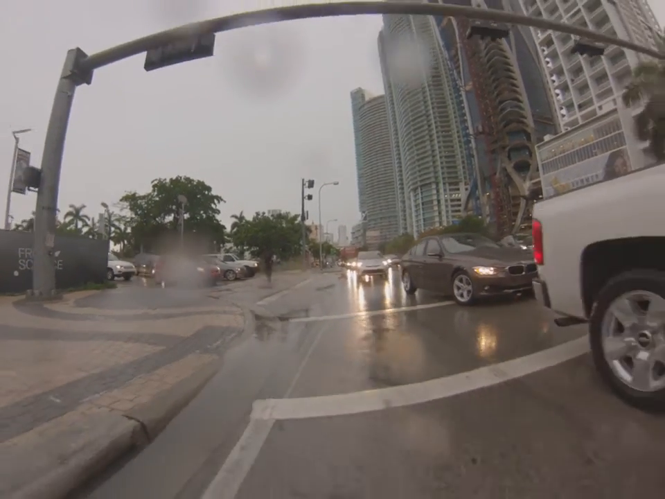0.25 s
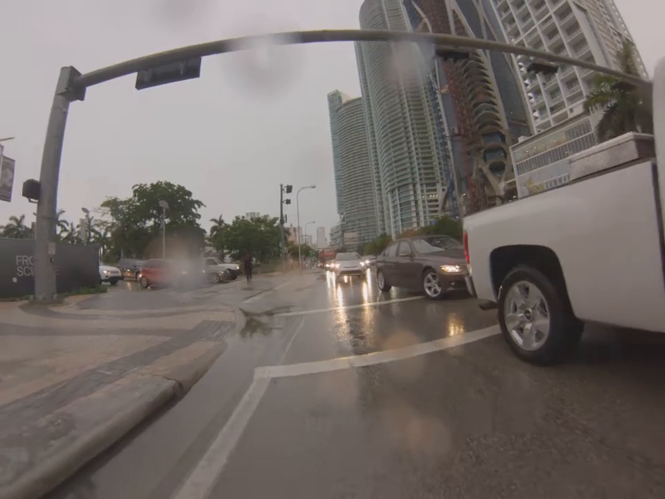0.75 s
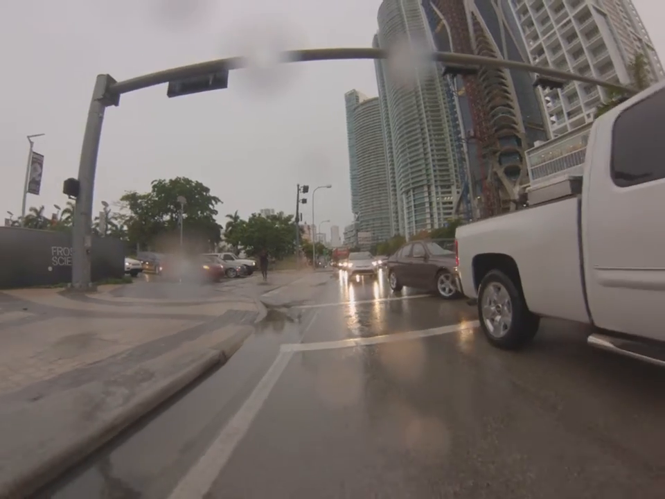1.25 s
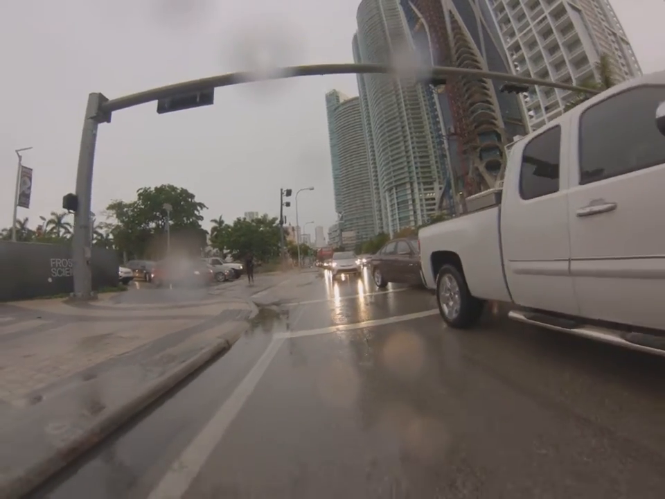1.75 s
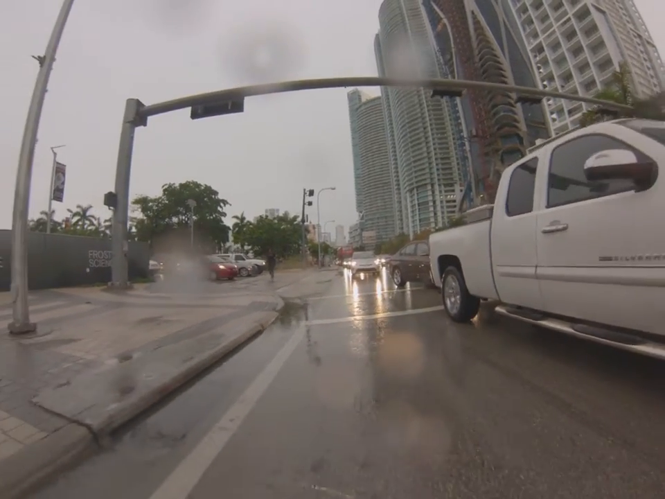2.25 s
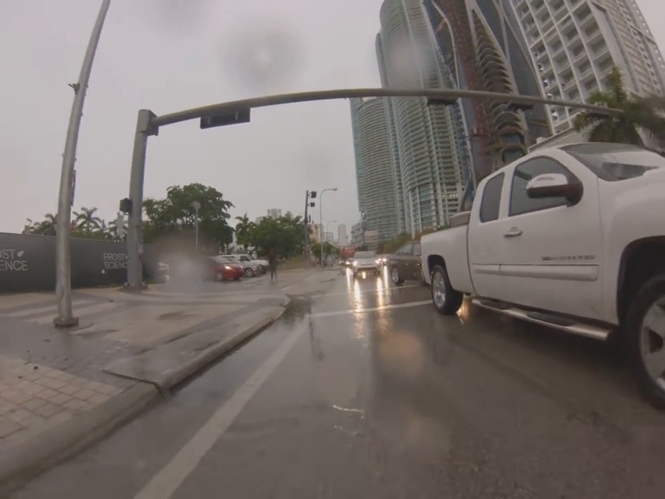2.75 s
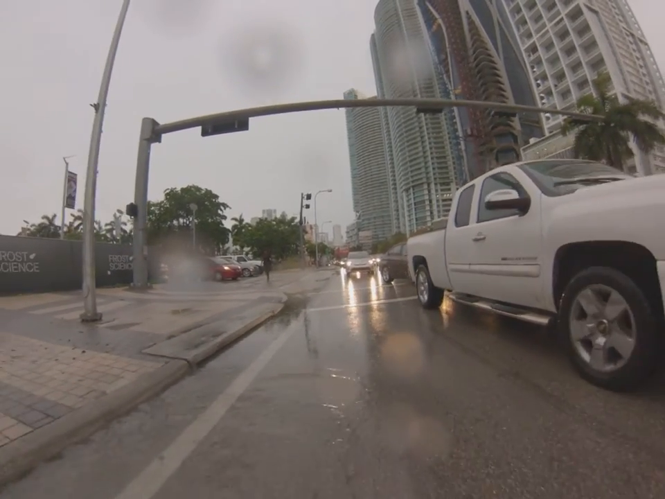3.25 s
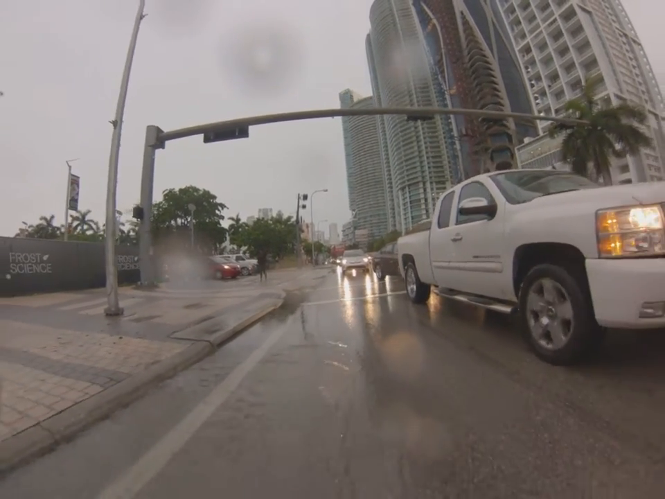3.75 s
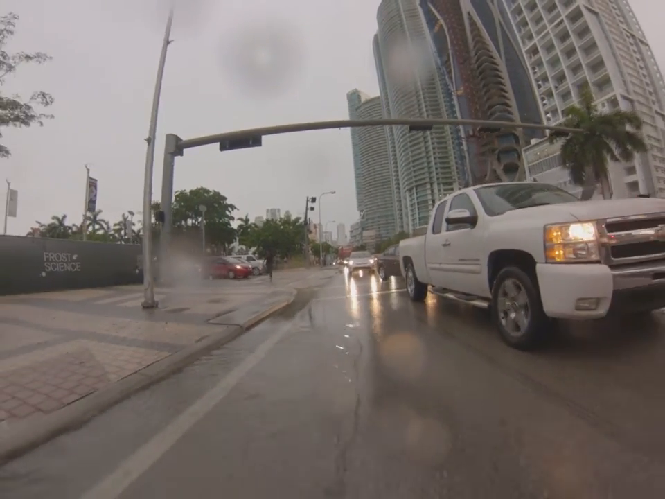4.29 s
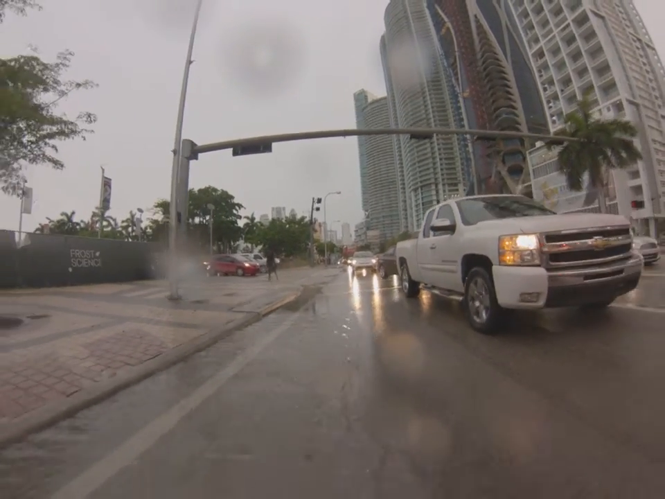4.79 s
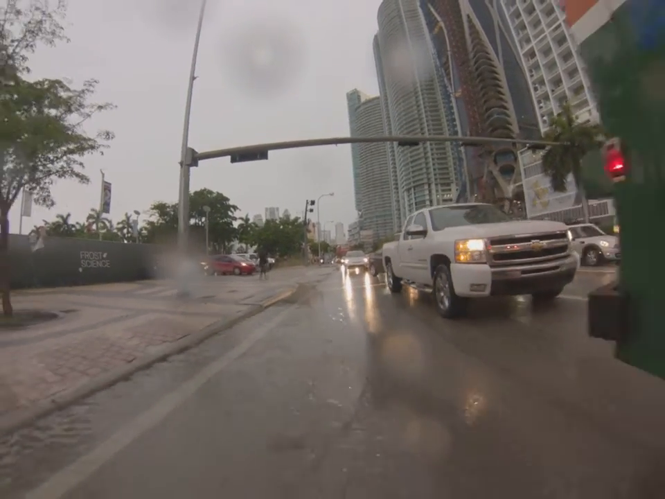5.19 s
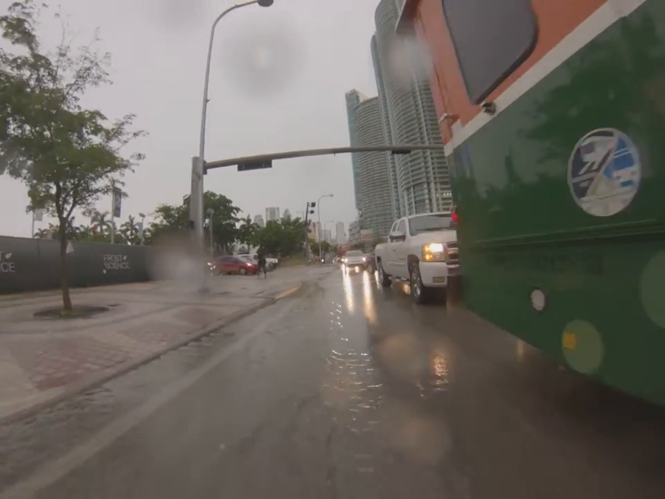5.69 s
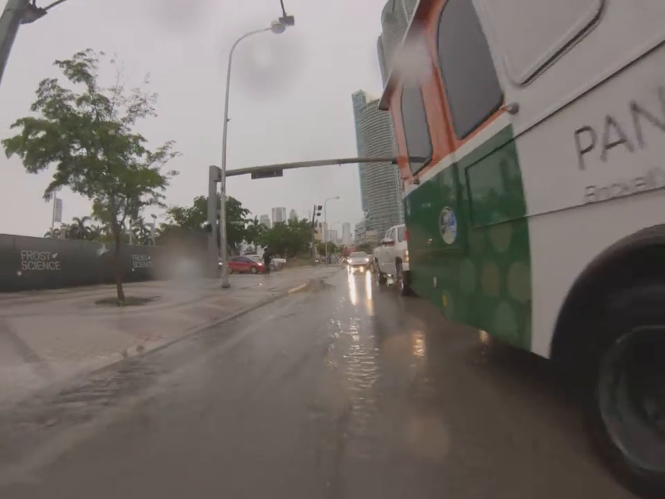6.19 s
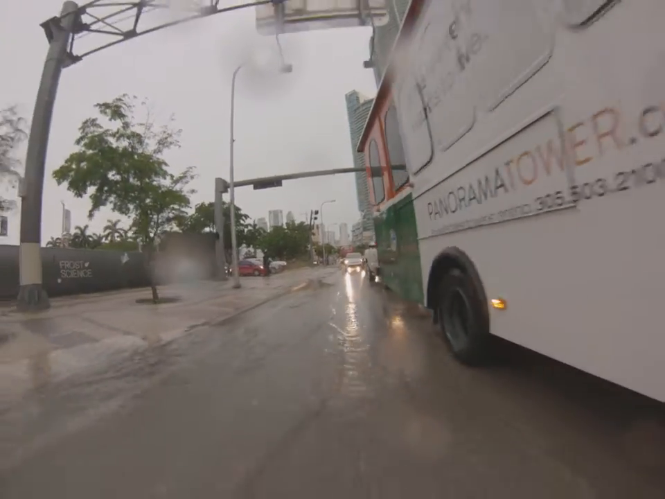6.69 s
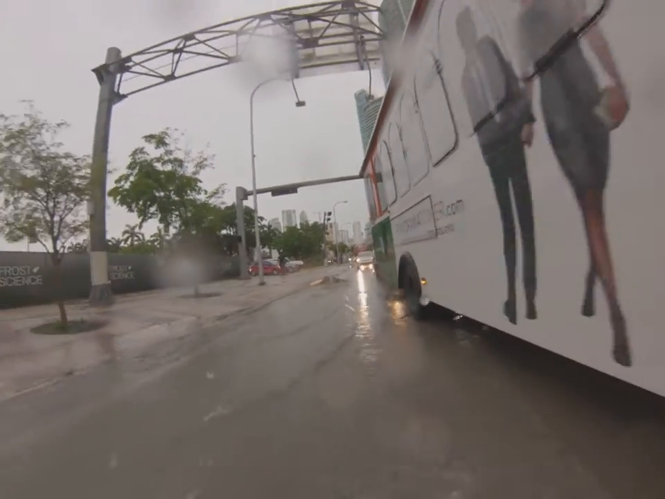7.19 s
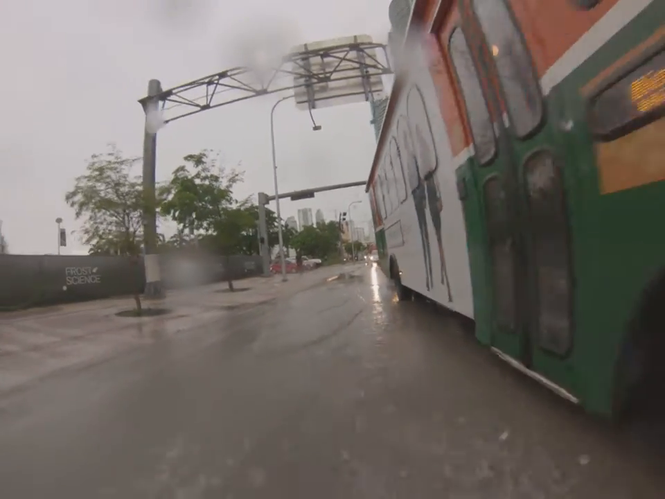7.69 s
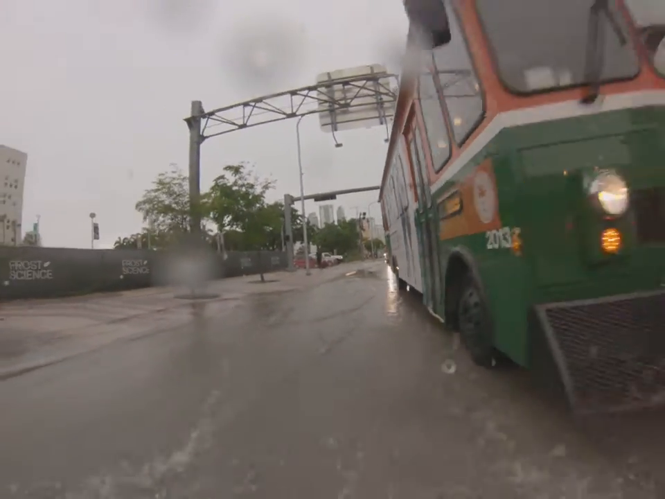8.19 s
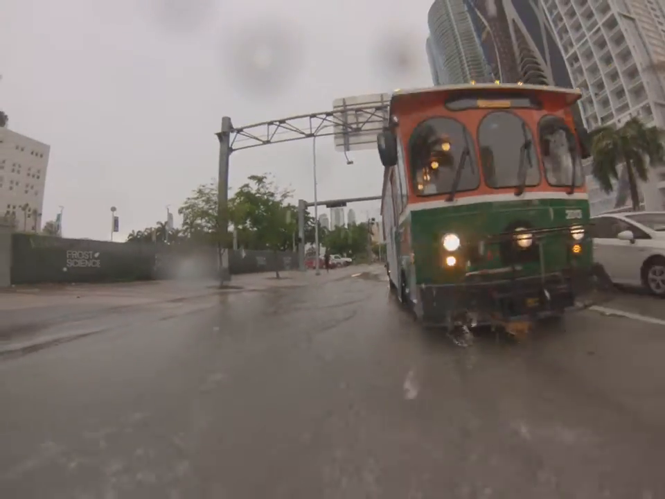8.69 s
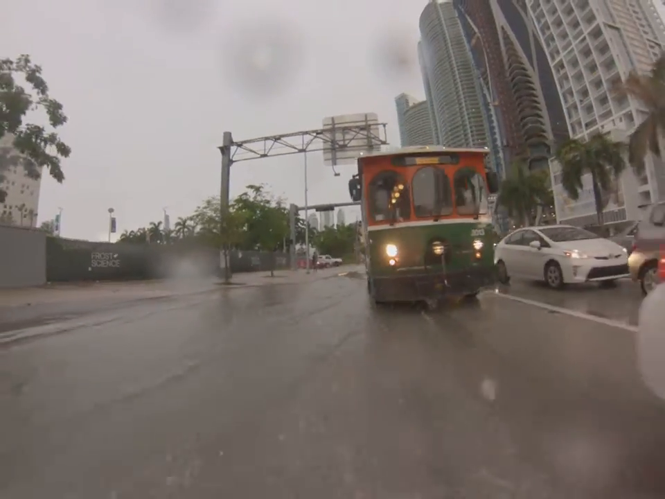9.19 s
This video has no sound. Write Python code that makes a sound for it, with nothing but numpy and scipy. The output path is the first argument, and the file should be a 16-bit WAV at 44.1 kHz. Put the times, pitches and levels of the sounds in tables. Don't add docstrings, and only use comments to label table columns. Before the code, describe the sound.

A V-twin motorcycle idles with muffled, lumpy booming, blips its throttle, then pulls away through standing water as tyre spray hisses louder.

```python
import sys
import numpy as np
from scipy import signal
from scipy.io import wavfile
from scipy.ndimage import uniform_filter1d

SR = 44100
rng = np.random.default_rng(int(sys.argv[2]) if len(sys.argv) > 2 else 0)


def store_wav(level_fs):
    pcm = np.round(np.clip(np.atleast_2d(level_fs), -1, 1) * 32767)
    wavfile.write(sys.argv[1], SR, pcm.T.astype(np.int16))


def boost(x):
    u = np.asarray(x, float) / 20
    return 10 ** u


N = 416744
T = np.arange(N) / SR
LEAD = 8000

# time_s, cycles_per_s
SPEED = [(0.0, 16.804), (0.46, 11.733), (0.8, 11.192), (2.62, 11.008), (3.18, 10.834), (3.5, 13.232),
         (3.77, 11.794), (3.93, 12.068), (4.2, 13.93), (4.43, 11.046), (4.53, 11.501), (4.75, 18.2),
         (4.88, 18.665), (5.2, 14.029), (5.57, 14.433), (6.28, 13.566), (7.8, 15.55), (9.45, 16.477)]
# time_s, level_db
EFFORT = [(0, -28), (.25, -31.5), (.8, -30.5), (1.25, -28), (1.6, -29.5), (2.5, -28.5), (3.16, -29),
          (3.37, -23.5), (3.55, -31), (3.85, -23.5), (4.2, -26), (4.35, -30.5), (4.76, -21.5), (5.08, -27),
          (5.35, -25.5), (6.4, -28.5), (8.6, -27.5), (9.45, -27)]


def evened(x):
    return x / np.sqrt(np.mean(x ** 2) + 1e-20)


def column(rows, index):
    return np.interp(T, [r[0] for r in rows], [r[index] for r in rows])


def colour(x, points):
    f, db = np.transpose(points)
    hz = np.abs(np.fft.fftfreq(2 ** 15, 1 / SR))
    gain_db = np.interp(np.log(hz + 1), np.log(f), db, -90, -120)
    log_gain = np.log(boost(np.maximum(gain_db, -120)))
    taps = np.fft.ifft(np.exp(np.conj(signal.hilbert(log_gain)))).real[:2 ** 14]
    return signal.oaconvolve(x, taps)[:len(x)]


def resonate(x, hz, width):
    turn = np.exp(2j * np.pi * np.cumsum(hz * np.ones(N)) / SR)
    r = np.exp(-np.pi * width / SR)
    return (turn * signal.lfilter([1], [1, -2 * r, r * r], x / turn)).real


def steady(x, seconds):
    width = int(seconds * SR)
    power = uniform_filter1d(uniform_filter1d(x ** 2, width), width)
    return x / np.sqrt(power + 1e-20)


def wander(hz):
    pole = [1, -np.exp(-2 * np.pi * hz / SR)]
    once = signal.lfilter([1], pole, rng.standard_normal(N))
    return evened(signal.lfilter([1], pole, once))


def strokes(pattern, late_s, uneven_db):
    places, dbs = np.transpose(pattern)
    turns = np.cumsum(np.pad(column(SPEED, index=1), (LEAD, 0), "edge")) / SR
    cycle = np.arange(-4, 196)[:, None]
    luck = rng.standard_normal((200, len(places), 2))
    at = np.interp(cycle + places, turns - turns[LEAD], np.arange(N + LEAD), -SR, -SR)
    at = at + late_s * SR * luck[..., 0]
    size = boost(dbs + uneven_db * luck[..., 1])
    clicks = np.bincount(at[at > 0].astype(int), size[at > 0], N + SR)[:N + LEAD]
    return signal.oaconvolve(clicks, np.hanning(41), "same")


def puffs(clicks, rise_s, fall_s, rest):
    t = np.arange(4000) / SR
    shape = (1 - np.exp(-t / rise_s)) * np.exp(-t / fall_s)
    swell = signal.oaconvolve(clicks, shape)[LEAD:LEAD + N]
    return (evened(swell) + rest) * rng.standard_normal(N)


def struck(rows, rise_s, fall_s, level_db):
    onset_s = .00199
    t, out = np.arange(3000) / SR, np.zeros(N + 3000)
    shape = (1 - np.exp(-t / rise_s)) ** 2 * np.exp(-t / fall_s)
    shape = shape / shape.max()
    for s, db, hz in rows:
        ring = boost(db + level_db) * shape * np.sin(2 * np.pi * hz * t)
        out[round((s - onset_s) * SR):][:len(t)] += ring
    return out[:N]


def jolts():
    # time_s, level_db, half_length_s
    bumps = [(1.29, 6.5, 0.035), (1.44, -8.5, 0.032), (1.968, -9.5, 0.038), (2.965, -4, 0.044),
             (3.037, 4.5, 0.035), (3.758, 6.5, 0.049), (3.946, 5.5, 0.024), (4.021, -10, 0.036),
             (4.426, 3.5, 0.05), (4.69, -4, 0.06), (5.112, -12, 0.021), (6.618, 3.5, 0.15),
             (7.66, -5.5, 0.037), (8.764, 7, 0.021), (8.798, -12, 0.023), (9.174, -5.5, 0.038),
             (9.317, 2.5, 0.26), (9.414, -16, 0.019), (9.45, 2.5, 0.017), (2.25, 3, 0.07),
             (5.706, 3.5, 0.034), (5.89, 1, 0.071)]
    t = T[::40]
    level = sum(db * np.cos(np.pi / 2 * np.clip((t - s) / half, -1, 1)) ** 2 for s, db, half in bumps)
    return np.interp(T, t, level)


def follows(idle_db, per_effort, per_speed, per_jolt, per_pull):
    effort = column(EFFORT, index=1) + 29
    speed = column(SPEED, index=1) - 11
    pull = uniform_filter1d(np.gradient(speed) * SR, SR // 10)
    pull = pull * (T > .5)
    level = idle_db + per_effort * effort + per_speed * speed
    return boost(level + per_jolt * jolts() + per_pull * pull)


def boom():
    # cycle_place (0-1), strength_db
    burns = [
        (.246, 0.),
        (.866, -1.2),
    ]
    # frequency_hz, level_db
    mount = [(18, -42.5), (28, -18.5), (32, -8.5), (36, -4), (45, -2), (58, 6.5), (66, -3), (72, -4),
             (79, -21), (89, -13), (99, -17.5), (122, -36.5), (145, -28.5), (165, -37.5), (260, -57)]
    # frequency_hz, level_db (per Hz)
    road = [(18, -18), (30, -5), (60, 0), (78, -9), (100, -13), (130, -32)]
    firings = strokes(burns, late_s=.0004, uneven_db=2.1)
    level = boost(column(EFFORT, index=1) + jolts())
    loose = boost(-11.5) * evened(colour(rng.standard_normal(N), road))
    return level * steady(evened(colour(firings, mount)[LEAD:]) + loose, 0.13)


def exhaust():
    # cycle_place (0-1), strength_db
    blows_at = [
        (.09, 0.),
        (.35, -8.),
        (.71, -5.5),
    ]
    # frequency_hz, level_db (per Hz)
    pipe = [(120, -31), (190, -6), (250, -3.5), (330, -3.5), (450, -1.5), (600, -19), (800, -26.5),
            (1100, -53)]
    # frequency_hz, width_hz, level_db
    pipe_modes = [(250, 50, -7), (303, 40, -1.5), (400, 55, -10)]
    # idle_db, db_per_effort_db, db_per_cycle_per_s, jolt_share, db_per_cycle_per_s2
    puff_gain = (-53, 0.21, 0.9154, 0.63, 0.0632)
    blows = strokes(blows_at, late_s=.0004, uneven_db=1.)
    pulse = boost(-22) * evened(np.roll(blows, 130)[LEAD:])
    rough = evened(puffs(blows, rise_s=.004, fall_s=.008, rest=.4))
    blown = colour(rough + pulse, pipe)
    ring = sum(boost(db) * evened(resonate(blows[LEAD:], hz, width)) for hz, width, db in pipe_modes)
    return follows(*puff_gain) * steady(evened(blown) + ring, 0.15)


def clatter():
    # cycle_place (0-1), strength_db
    knocks_at = [
        (.13, -6.),
        (.5, -10.),
        (.68, -8.),
        (.78, 0.),
    ]
    # frequency_hz, level_db (per Hz)
    case = [(450, -38), (600, -17), (800, -19.5), (1000, -15), (1300, -10), (1500, -2), (1750, -13.5),
            (2300, -18), (2900, -22.5), (3500, -30), (4400, -43.5), (6500, -69)]
    # frequency_hz, width_hz, level_db
    lid_hz, lid_width, lid_db = (1470, 200, -11.5)
    # frequency_hz, width_hz, level_db
    case_modes = [(4986, 230, -81.5), (6900, 310, -90), (4550, 72, -91)]
    # idle_db, db_per_effort_db, db_per_cycle_per_s, jolt_share, db_per_cycle_per_s2
    knock_gain = (-53, -0.25, 0.76, 0.3, 0.0844)
    knocks = strokes(knocks_at, late_s=0.0015, uneven_db=1.4)
    rush = puffs(knocks, rise_s=0.0027, fall_s=0.0028, rest=4.0)
    blows_on_lid = puffs(knocks, rise_s=.002, fall_s=.006, rest=.45)
    lid = boost(lid_db) * evened(resonate(blows_on_lid, lid_hz, lid_width))
    rings = sum(boost(db + 43.0) * evened(resonate(rush, hz, width)) for hz, width, db in case_modes)
    return follows(*knock_gain) * (steady(evened(colour(rush, case)) + lid, 0.65) + rings)


def whine():
    # time_s, level_db
    whine_level = [
        (0, -69),
        (.2, -73),
        (.5, -69.5),
        (3.2, -68),
        (3.4, -93.5),
        (9.45, -97.5),
    ]
    teeth = 67.3
    hz = teeth * uniform_filter1d(np.minimum(column(SPEED, index=1), 11.3), SR // 2)
    line = np.sqrt(2) * np.sin(2 * np.pi * np.cumsum(hz + 13 * wander(hz=25.6)) / SR)
    return boost(column(whine_level, index=1) + 2.6 * wander(hz=44)) * line


def spray():
    # time_s, level_db
    spray_level = [(0, -89), (1.8, -89.5), (3.3, -86), (3.95, -84.5), (4.3, -85), (5.1, -82.5),
                   (6.3, -78.5), (7.3, -75.5), (9.45, -76.5)]
    # frequency_hz, level_db (per Hz)
    spray_colour = [(350, -28), (550, 5.5), (1000, 4), (1500, 5.5), (2500, 1), (3500, -9.5), (4600, -23.5),
                    (5600, -27), (7000, -29), (8500, -36.5), (10500, -38), (12500, -44.5), (13500, -70)]
    # frequency_hz, level_db (per Hz)
    mist_colour = [(11500, -30), (12800, 0), (13800, -6), (14800, -30)]
    sizes = boost(4 * np.minimum(rng.exponential(1, N), 4))
    falls = rng.random(N) < 2500 / SR
    drops = sizes * falls * rng.choice([-1, 1], N)
    bursts = boost(-55 + 8 * np.minimum(wander(hz=14), 1.5))
    mist = bursts * evened(colour(rng.standard_normal(N), mist_colour))
    hiss = rng.standard_normal(N) * boost(1.5 * wander(hz=25.5)) + 0.63 * evened(drops)
    return boost(column(spray_level, index=1) + 23.0) * (evened(colour(hiss, spray_colour)) + mist)


def rolling():
    # frequency_hz, level_db (per Hz)
    tyre = [(60, -27.5), (85, -2), (120, 1.5), (170, -2), (220, -10), (300, -25)]
    # time_s, pitch_hz, level_db
    chain = [(0, 215, -90), (4.9, 215, -80), (5.1, 228, -57), (5.5, 275, -53), (5.8, 305, -55),
             (6.15, 328, -59), (6.5, 338, -62), (6.7, 335, -85), (8.1, 316, -80), (8.4, 318, -54),
             (9.45, 323, -54)]
    # idle_db, db_per_effort_db, db_per_cycle_per_s, jolt_share, db_per_cycle_per_s2
    rumble_gain = (-53, 0.08, 0.8, 0.6, -0.17)
    rumble = follows(*rumble_gain) * steady(colour(rng.standard_normal(N), tyre), 0.043)
    pitch = column(chain, index=1)
    hum = np.zeros(N)
    for k, db in [(1, -4), (2, -10.5)]:
        hum += boost(db) * steady(resonate(rng.standard_normal(N), k * pitch, width=6), 0.068)
    return rumble + boost(column(chain, index=2)) * hum


def frame_hum():
    # idle_db, db_per_effort_db, db_per_cycle_per_s, jolt_share, db_per_cycle_per_s2
    hum_gain = (-65.5, 0, 3.5, -1, 0)
    turns = 6 * np.cumsum(column(SPEED, index=1)) / SR
    return follows(*hum_gain) * boost(5.0 * wander(hz=4)) * np.sin(2 * np.pi * (turns + 0.48))


def pops():
    # time_s, peak_db, pitch_hz
    pop_rows = [(0.135, -33, 267), (0.169, -35, 355), (0.771, -39, 231), (1.276, -31, 245),
                (1.847, -35.5, 310), (2.661, -36, 274), (2.754, -50, 283), (2.846, -43, 334),
                (2.938, -40, 331), (3.033, -50, 266), (3.123, -35, 332), (3.217, -42, 358),
                (3.695, -39, 387), (4.027, -36, 458), (4.1, -33, 446), (4.176, -26, 336), (4.659, -44, 304),
                (4.717, -40, 245), (4.752, -42, 253), (4.809, -35, 325), (4.882, -35, 269),
                (5.202, -31, 260), (5.324, -31, 264), (5.467, -35, 300), (5.539, -41, 272),
                (5.677, -41, 269), (5.889, -30, 266), (6.031, -33, 370), (6.106, -33, 470),
                (6.178, -36, 444), (6.252, -36, 444), (6.469, -34, 360), (6.541, -38, 272),
                (6.612, -30, 299), (6.685, -30, 396), (6.757, -39, 229), (6.826, -31, 304),
                (7.006, -37, 318), (7.102, -34, 396), (7.238, -44, 318), (7.371, -34, 423),
                (7.437, -30.5, 310), (7.698, -33.5, 344), (7.764, -34, 315), (7.828, -37, 320),
                (7.874, -24, 239), (8.023, -28, 231), (8.083, -49, 327), (8.127, -37, 374),
                (8.149, -44, 353), (8.213, -31, 383), (8.279, -35, 340), (8.403, -43, 283),
                (8.468, -33, 355), (8.755, -26.5, 423), (8.872, -42, 231), (8.898, -31, 360),
                (9.025, -34, 390), (9.331, -41, 328), (9.367, -38, 350)]
    return struck(pop_rows, rise_s=0.00069, fall_s=0.0055, level_db=-7)


def raps():
    # time_s, peak_db, pitch_hz
    rap_rows = [(0.1775, -47, 1500), (0.3204, -40, 1500), (0.4599, -37.5, 1550), (0.6384, -38.5, 1510),
                (0.834, -40, 1480), (0.9856, -36.5, 1520), (1.0106, -37.5, 1460), (1.0989, -38.5, 1500),
                (1.1887, -37.5, 1470), (1.3992, -41, 1480), (1.4605, -37, 1490), (1.6402, -42, 1525),
                (1.7924, -41, 1570), (1.8203, -39, 1610), (1.8831, -45, 1460), (1.9425, -36, 1504),
                (2.002, -33, 1480), (2.1844, -36.5, 1494), (2.5416, -46, 1430), (2.7246, -35.5, 1540),
                (2.76, -46, 1640), (2.9113, -37, 1404), (3.036, -41, 1643), (3.2779, -36, 1490),
                (3.3089, -38, 1530), (3.3623, -43.5, 1500), (3.441, -37, 1420), (3.6167, -41, 1600),
                (3.6697, -36.5, 1460), (3.9245, -43, 1660), (4.567, -34, 1474), (4.6997, -44, 1400),
                (4.7571, -34.5, 1520), (4.811, -36, 1526), (4.8604, -37, 1470), (6.0222, -46, 1480),
                (6.116, -38.5, 1450), (6.4837, -44, 1460), (6.6623, -37, 1500), (6.8039, -36.5, 1453),
                (6.8748, -30, 1480), (6.9441, -35, 1516), (6.971, -33.5, 1470), (7.1496, -33.5, 1453),
                (7.418, -37.5, 1505), (7.4833, -33.5, 1476), (7.5976, -45, 1440), (8.0622, -34, 1510),
                (8.2534, -43, 1630), (8.3175, -33, 1330), (8.3449, -39, 1470), (8.632, -34, 1404),
                (8.657, -36, 1420), (8.8044, -45, 1460), (8.8468, -41, 1420), (8.9017, -37, 1530),
                (9.1895, -38, 1380), (9.2145, -41, 1470), (9.3112, -31.5, 1470), (9.3736, -45, 1460)]
    return struck(rap_rows, rise_s=0.0013, fall_s=0.005, level_db=-5)


def slaps():
    # time_s, peak_db
    slap_rows = [(0.208, -57), (1.129, -44), (3.335, -40.5), (3.376, -42), (3.726, -44), (3.768, -45.5),
                 (3.973, -43.5), (4.057, -38), (4.169, -45), (4.591, -43.5), (4.619, -41.5), (4.64, -48),
                 (4.758, -38), (4.872, -44), (4.951, -49), (5.046, -43.5), (5.283, -41), (5.354, -39),
                 (5.428, -37), (5.499, -38.5), (5.685, -37.5), (5.895, -34), (5.965, -45), (6.521, -43),
                 (6.544, -43), (6.591, -40), (6.734, -55), (6.944, -45), (7.012, -35.5), (7.35, -41),
                 (7.417, -44), (7.744, -40), (7.873, -38.5), (8.088, -43.5), (8.127, -40), (8.317, -46),
                 (8.343, -42), (8.468, -41), (8.757, -35.5), (8.968, -40.5), (9.001, -48.5), (9.189, -42),
                 (9.252, -40.5), (9.313, -42.5)]
    # frequency_hz, level_db
    slap_colour = [(200, -17.5), (400, 6), (800, -6.5), (1300, 0), (1700, -13), (2200, -23.5), (3500, -36)]
    peak_s = 0.0023
    at, t = np.zeros(N), np.arange(800) / SR
    for s, db in slap_rows:
        at[round(s * SR)] = boost(db + 11)
    burst = signal.oaconvolve(at, t / peak_s * np.exp(1 - t / peak_s))[:N]
    return colour(burst * rng.choice([-1., 1.], N), slap_colour)


def growl():
    # speed_multiple, start_s, end_s, level_db
    orders = [
        (13, .4, 5.2, -59),
        (17, .6, 3.2, -64),
        (11, 3.2, 7.5, -60),
        (13.25, 6.8, 9.6, -56),
        (22, 6.4, 9.6, -57),
        (27, 8.4, 9.6, -61),
        (10, 8, 9.6, -59),
        (34.5, 5.4, 6.8, -61),
        (7, 7.2, 8.4, -54),
    ]
    fade_s = 0.37
    turns, sway = np.cumsum(column(SPEED, index=1)) / SR, wander(hz=6.9)
    out = np.zeros(N)
    for i, (k, start, end, db) in enumerate(orders):
        on = (T > start) & (T < end)
        fade = np.minimum(np.minimum(T[on] - start, end - T[on]) / fade_s, 1)
        waver = np.roll(sway, i * SR)[on]
        line = np.sin(2 * np.pi * (k * turns[on] + .07 * waver))
        out[on] += fade * boost(db + 4 + 2 * waver) * line
    return out


def ticks():
    # time_s, peak_db
    lone = [(0.549, -64.5), (1.989, -63), (2.4044, -67), (3.2, -67), (3.865, -66.5), (3.388, -57),
            (3.7574, -78), (3.8114, -63), (3.896, -64), (3.9815, -56.5), (4.058, -65), (4.167, -61),
            (4.9957, -59), (5.5692, -66), (5.8516, -62), (6.36, -64), (7.9498, -64.5), (8.11, -78),
            (8.6438, -67), (8.769, -56.5), (9.2274, -62), (9.3866, -58.5)]
    # time_s, peak_db
    further_ticks = [(0.9594, -74), (1.6222, -77), (1.7554, -67), (2.2553, -78), (2.589, -70), (2.8704, -71),
                     (3.0435, -71.5), (3.454, -78), (3.7369, -64), (4.0103, -74), (4.0407, -65), (4.0776, -67),
                     (4.2248, -71), (4.2587, -68.5), (4.7282, -72), (4.7476, -66), (4.9656, -64.5), (7.7394, -73),
                     (7.7694, -72), (7.8865, -65), (8.2694, -65), (8.9094, -78)]
    # time_s, crest_db, rebound_db
    pairs = [(3.336, -62, -61), (3.583, -72, -58), (3.7707, -58.5, -61.5), (3.941, -56, -63.5),
             (4.582, -63, -62), (4.622, -59, -63), (4.7623, -68, -59.5), (4.818, -59, -58),
             (4.8728, -57, -61), (4.929, -61, -59), (5.0484, -69, -65), (5.284, -79, -62),
             (5.356, -59, -64), (5.429, -61, -66), (5.4995, -79, -65), (6.137, -64, -65),
             (9.3165, -57, -59)]
    # frequency_hz, level_db
    tick_colour = [(1500, -27), (3000, 6), (6000, -0.5), (10000, -7), (13000, -12), (16000, -14)]
    # time_s, level_db
    drop_s, drop_db = (5.2655, -31.5)
    rebound_s = .009
    events = lone + [(s, db - 2.5) for s, db in further_ticks]
    events = events + [p[:2] for p in pairs] + [(s + rebound_s, db) for s, _, db in pairs]
    at = np.zeros(N)
    for s, db in events:
        at[round((s + .002) * SR)] = boost(db)
    t = np.arange(-3000, 3001) / SR
    grains = boost(6 * np.minimum(rng.exponential(1, N // 40 + 1), 3) - 6)
    grains = grains.repeat(40)[:N]
    tick = signal.oaconvolve(at, np.exp(-(t / 0.00097) ** 2), "same")
    halo = signal.oaconvolve(at, np.exp(-(t / 0.014) ** 2), "same")
    buzz = boost(-22.5) * grains * halo
    chatter = boost(1.0) * colour((tick + buzz) * rng.standard_normal(N), tick_colour)
    drop = -boost(drop_db) * signal.unit_impulse(N, int(drop_s * SR))
    return chatter + signal.lfilter([0.49, 0.31, -.2, -0.19, -0.15], [1, -.45], drop)


def scene():
    # frequency_hz, level_db
    seal = [(30, -2.5), (2300, -0.5), (2470, 4.5), (2700, -9.5), (2850, 2), (3070, -10), (3350, 2),
            (3520, 0), (3700, 2), (4150, 2), (4360, -1.5), (4550, 1.5), (4850, -1), (5030, 7.5),
            (5250, 2.5), (20000, 7.5)]
    engine = boom() + exhaust() + whine() + frame_hum() + growl()
    through_port = colour(clatter() + spray(), seal)
    knocks = raps() + pops() + slaps() + ticks()
    return (engine + rolling() + through_port + knocks)[None]


def band_limit(x):
    return signal.sosfilt(signal.butter(12, 16500, fs=SR, output="sos"), x)


def record(dry):
    # frequency_hz, level_db
    hiss_colour = [(2000, -4), (5000, -1.5), (9000, -8.5), (12500, -16.5), (13500, -45.5)]
    hiss = boost(-100.5 + 2.5 * wander(hz=12)) * evened(colour(rng.standard_normal(N), hiss_colour))
    low = signal.lfilter(*signal.butter(2, 150, fs=SR), dry)
    lopsided = signal.lfilter(*signal.butter(2, 25, "high", fs=SR), low ** 2)
    bent = dry - 0.12 * lopsided
    return band_limit(0.225 * np.tanh(bent / 0.21) + hiss)


dry = scene()
out = record(dry)
store_wav(out)
```